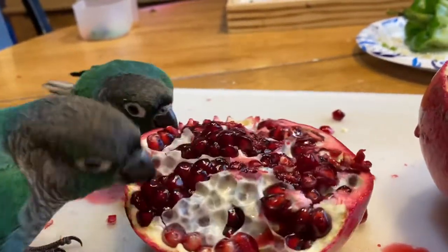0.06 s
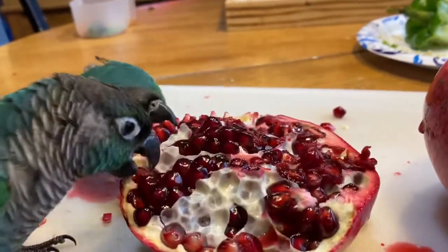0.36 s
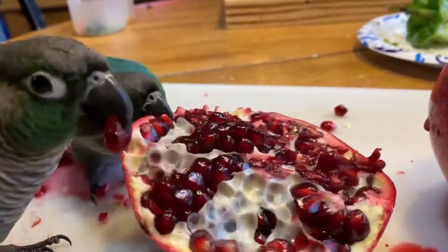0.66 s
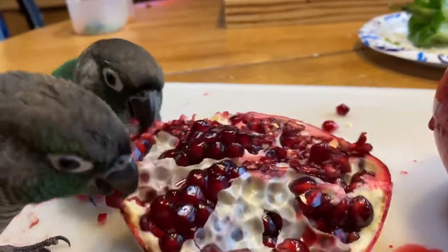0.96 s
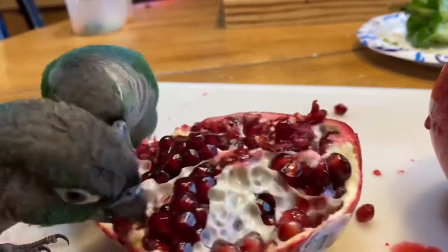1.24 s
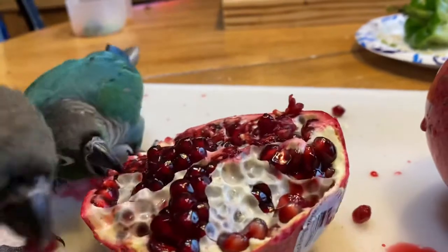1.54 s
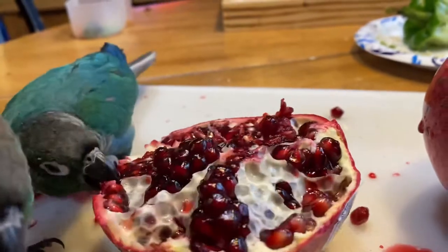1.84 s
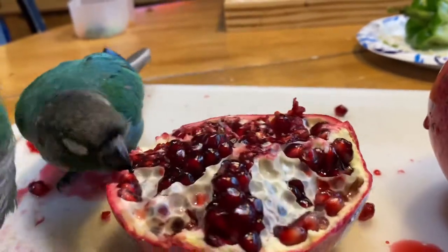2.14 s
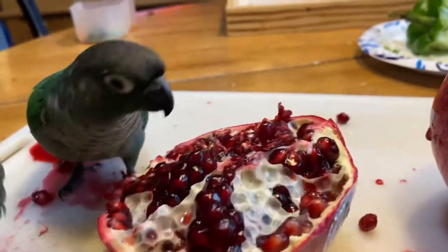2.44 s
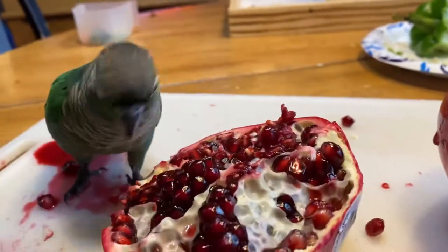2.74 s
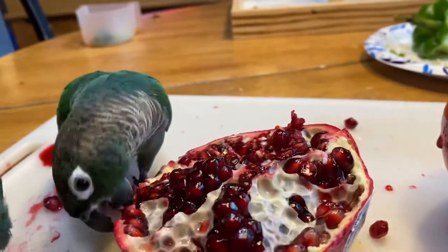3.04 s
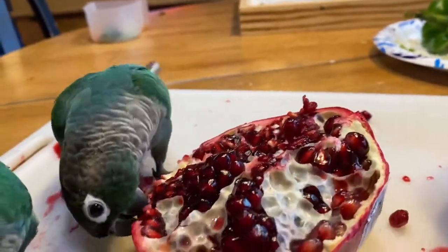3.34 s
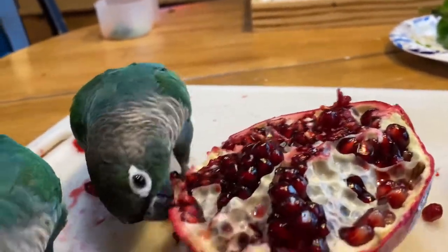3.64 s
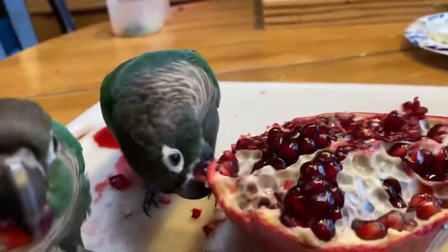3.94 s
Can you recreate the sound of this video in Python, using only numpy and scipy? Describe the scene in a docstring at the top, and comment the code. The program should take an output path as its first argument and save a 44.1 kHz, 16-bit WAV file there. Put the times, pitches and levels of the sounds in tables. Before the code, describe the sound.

Parrots nibble a juicy pomegranate with small sharp snaps and wet crackles in a quiet room.

```python
"""Two small parrots eat a halved pomegranate on a cutting board, close by.
Seed skins burst with sharp snaps, wet pulp crackles as it is squeezed, and a beak creaks
as it sticks and slips on the rind. The fruit knocks on the board, something rustles once,
and a thin hiss comes and goes. Under it all a household appliance drones in a quiet room."""
import sys
import numpy as np
from scipy import signal
from scipy.fft import rfft, irfft
from scipy.io import wavfile
from scipy.ndimage import uniform_filter1d

SR = 44100
rng = np.random.default_rng(int(sys.argv[2]) if len(sys.argv) > 2 else 0)


def int16_out(signal):
    """Quantize to a 16-bit WAV file."""
    q = np.round(np.clip(np.atleast_2d(signal).T, -1, 1) * 32767)
    wavfile.write(sys.argv[1], SR, q.astype(np.int16))


N = 176400  # 4 seconds
TIMES, FREQS = np.arange(N) / SR, np.fft.rfftfreq(N, 1 / SR)
OPPOSITE = np.array([[1], [-1]])  # adds a sound on the left and subtracts it on the right


def undb(db):
    """Turn decibels into a number to multiply by."""
    return 10 ** (np.asarray(db) / 20)


def unit(x):
    """Scale a sound so its average strength (rms) is 1."""
    return x / np.sqrt(np.mean(x ** 2))


def noise():
    """White noise: an even hiss."""
    return rng.standard_normal(N)


def colour(x, spectrum):
    """Make each frequency louder or softer, following rows of Hz and dB."""
    hz, db = np.array(spectrum).T
    gain = undb(np.interp(np.log(FREQS + 1), np.log(hz), db))
    return irfft(rfft(x) * gain, N)


def band(x, hz, octaves):
    """Keep the frequencies around one pitch, at strength 1."""
    away = np.log2((FREQS + 1) / hz) / octaves
    return unit(irfft(rfft(x) * np.exp(-away ** 2 / 2), N))


def curve(rows):
    """Join rows of time and value with straight lines."""
    return np.interp(TIMES, *np.array(rows).T)


def wander(per_s):
    """Glide between random values, about 1 in size."""
    step = int(SR / per_s)
    stairs = np.repeat(rng.standard_normal(N // step + 1), step)
    return unit(uniform_filter1d(stairs, step)[:N])


def envelope(t, attack, hold, decay):
    """Rise, stay up until the time `hold`, then die away."""
    return np.clip(t / attack, 0, 1) * np.exp(-np.maximum(t - hold, 0) / decay)


def grains(per_s, spread_db):
    """Tiny clicks of uneven size at random times."""
    clicks = (rng.random(N) < per_s / SR) * np.sign(noise())
    sizes = undb(spread_db * np.minimum(rng.exponential(size=N), 4))
    return unit(clicks * sizes)


def nearby(make, likeness=.93, lag_ms=.275):
    """A close sound in stereo: both sides mostly alike, the left a little late."""
    left, right = np.sqrt(likeness) * make() + np.sqrt(1 - likeness) * np.array([make(), make()])
    return np.array([np.roll(left, int(lag_ms * SR / 1000)), right])


def add(out, start, x):
    """Mix in a short sound at a time in seconds."""
    i = max(int(start * SR), 0)
    out[..., i:i + x.shape[-1]] += x[..., :N - i]


def early_echoes(x, count=12, longest_ms=13, db=-3, above_hz=830):
    """Nearby surfaces ripple the treble with weak, quick echoes."""
    lags = rng.uniform(.1, 1, (count, 2, 1)) * longest_ms / 1000
    echoes = sum(np.exp(-2j * np.pi * FREQS * lag) for lag in lags) / np.sqrt(count)
    treble = FREQS ** 2 / (FREQS ** 2 + above_hz ** 2)
    return irfft(rfft(x) * (1 + undb(db) * echoes * treble), N)


def room_echo(x, fade_s=.11, db=-12.5):
    """The room adds a short, dull echo that falls 60 dB in fade_s."""
    t = np.arange(SR // 2) / SR
    dull = signal.lfilter([1], [1, -.5], rng.standard_normal((2, len(t))))
    tail = dull * np.exp(-np.log(1000) * t / fade_s) * (t > .004)
    return x + undb(db) * signal.fftconvolve(x, unit(tail) / np.sqrt(len(t)), axes=1)[:, :N]


# Room noise: the part both sides share, and the part that differs between them.
# Each row: frequency in Hz, level in dB.
AIR_SHARED = [(20, -102), (45, -68.5), (90, -73), (230, -66.5), (270, -74.5), (400, -80), (620, -84.5),
              (740, -79), (930, -88.5), (1600, -89), (2500, -94), (3800, -102), (4700, -97), (6000, -106),
              (8000, -116), (11000, -130), (16000, -134)]
AIR_DIFFERENT = [(20, -67), (50, -98), (85, -63), (120, -82.5), (210, -73.5), (270, -81.5), (400, -81),
                 (600, -83.5), (740, -78), (950, -87), (1900, -91.5), (2600, -99), (3800, -103.5),
                 (4700, -101.5), (6000, -107), (8000, -118), (11000, -130), (16000, -134)]

def room_air():
    """The soft, low rush of air in a quiet room."""
    air = colour(noise(), AIR_SHARED) + OPPOSITE * colour(noise(), AIR_DIFFERENT)
    return air * np.sqrt(SR / 2)


# The pitches in the drone. Each row: pitch in Hz, width in Hz, level in dB.
DRONE_PEAKS = [(60.9, 5.7, -43), (72.2, 6.3, -42.5), (85.3, 8, -49.5), (123.1, 16.3, -41),
               (159.5, 18.8, -46.5), (204.2, 12.3, -43), (235, 6.4, -56), (302.8, 2.6, -60),
               (545.7, 4.9, -70), (734.6, 21, -63.5), (876.6, 16.3, -61.5), (419.7, 11, -70),
               (480.6, 8.1, -66.5)]

def appliance(side_db=-9, wide_hz=860):
    """An appliance resonates at a few narrow pitches; the low ones are alike on both sides."""
    power = sum(undb(db) ** 2 * unit(1 / (1 + ((FREQS - hz) / width) ** 2) ** 2) ** 2
                for hz, width, db in DRONE_PEAKS)
    peaks = np.sqrt(power)
    spread = undb(side_db) * np.minimum(FREQS / wide_hz, 1)
    return irfft(rfft(noise()) * peaks, N) + OPPOSITE * irfft(rfft(noise()) * peaks * spread, N)


# The rise and fall of the rumble. Each row: time in seconds, bass boost or cut in dB.
BASS_CHANGES = [(0, -7), (.38, 3.5), (.68, -6), (.9, -2.5), (1.6, 1), (2.2, 1.5), (2.62, 3), (2.85, -0.5),
                (3.4, -1), (4, -1.5)]

def background(waver_db=1, bass_top_hz=111):
    """Gently wavering air plus the drone; their bass slowly swells and sinks."""
    air, drone = room_air(), appliance()
    both = early_echoes(air) * undb(waver_db * wander(per_s=8.9)) + drone
    bass = irfft(rfft(both) / (1 + (FREQS / bass_top_hz) ** 8), N)
    return both + bass * (undb(curve(BASS_CHANGES)) - 1)


# Swells of hiss. Each row: time of the peak in seconds, level in dB, width in seconds.
HISS_PEAKS = [(1.133, -65.5, 0.12), (1.87, -64, 0.019), (2.51, -62, 0.049), (2.84, -61.5, .035),
              (3.04, -68, 0.037)]

def hiss(flicker_db=2):
    """A thin, faint hiss swells and fades now and then."""
    swells = sum(undb(db) * np.exp(-((TIMES - peak) / width) ** 2 / 2) for peak, db, width in HISS_PEAKS)
    flicker = undb(flicker_db * wander(per_s=46))
    return swells * flicker * band(nearby(noise), hz=4530, octaves=.089)


# The loudness of the rustle. Each row: time in seconds, relative level in dB.
RUSTLE_LEVELS = [(2.225, -80), (2.243, -48), (2.256, -39), (2.272, -38.5), (2.297, -42), (2.31, -40),
                 (2.335, -46), (2.37, -53), (2.45, -75)]
# Its tone. Each row: frequency in Hz, relative level in dB.
RUSTLE_TONE = [(300, 6), (650, 17), (1100, 7), (2500, 7.5), (4300, 3.5), (6000, 0.5), (8000, -8),
               (11000, -10), (16000, -21)]

def rustle(gain_db=-2, flicker_db=1.5):
    """A brief brushing, like feathers: close, scratchy clicks in a soft, wide hiss."""
    loudness = undb(gain_db + curve(RUSTLE_LEVELS) + flicker_db * wander(per_s=200))
    scratches = nearby(lambda: grains(per_s=2500, spread_db=1.7))
    brushing = np.array([noise(), noise()])
    return loudness * unit(colour(scratches + brushing, RUSTLE_TONE))


# Knocks on the board. Each row: start in seconds, level in dB, pitch of the thud in Hz.
BOARD_KNOCKS = [(0.566, -52, 750), (1.2044, -35, 590), (1.2295, -42, 700), (2.3081, -34, 1300),
                (3.352, -43, 1400), (3.651, -47, 720)]
# The board's notes. Each row: pitch in Hz, level against the knock in dB, seconds to fall 60 dB.
BOARD_NOTES = [(650, -11, .04), (725, -6, .05), (1075, -11, .035), (1260, -9, .02), (1900, -10, .02)]

def knocks():
    """The fruit taps the board: a dry thud, and the board rings briefly."""
    t, out = np.arange(SR // 6) / SR, np.zeros((2, N))
    shape = envelope(t, attack=.001, hold=.001, decay=.005)
    for start, db, thud_hz in BOARD_KNOCKS:
        tap = band(nearby(noise), thud_hz, octaves=.7)[:, :len(t)] * shape
        for hz, note_db, fade_s in BOARD_NOTES:
            ring = np.exp(-np.log(1000) * t / fade_s) * np.sin(2 * np.pi * hz * t)
            tap += undb(note_db) * ring * rng.uniform(.7, 1, (2, 1))
        add(out, start, undb(db) * tap)
    return out


# Slips of the beak on the rind. Each row: start in seconds, squeak pitch in Hz, squeak level in dB,
# milliseconds until the squeak starts to fade, scratch level in dB.
BEAK_SLIPS = [(1.4748, 1740, -41, 3.2, -41), (1.4851, 2200, -32, 2, -40),
              (1.4958, 2400, -29.5, 1.57, -30.5), (1.5069, 2420, -33, 1.5, -34),
              (1.5242, 1950, -31.5, 1.6, -40), (1.5671, 2694, -27.5, 2.7, -41),
              (1.5756, 2410, -27, 1.75, -40.5), (1.5811, 2720, -29, 1.44, -39.5),
              (1.59, 2320, -39, 0.62, -46)]
# The notes in a squeak. Each row: multiple of the squeak's pitch, level against the squeak in dB.
BEAK_NOTES = [(.33, -14), (.5, -20), (.78, -10), (1, -1), (1.3, -9.5), (2.05, -16), (2.9, -20.5)]
# The tone of the scratch. Each row: frequency in Hz, relative level in dB.
SCRATCH_TONE = [(350, 2), (800, 12), (1700, 0), (3500, -5), (7000, -2), (9000, -12), (12500, -17),
                (15000, -9)]

def beak_creak(tail_db=-21, left_louder_db=4):
    """The beak sticks and slips: each slip scratches, then squeaks for a few cycles."""
    t = np.arange(SR // 20) / SR
    ms = t * 1000
    squeaks, scratches = np.zeros((2, N)), np.zeros(N)
    for start, hz, db, hold_ms, scratch_db in BEAK_SLIPS:
        shape = envelope(ms, attack=.5, hold=hold_ms, decay=.5)
        tail_shape = undb(tail_db) * envelope(ms, attack=1.1, hold=hold_ms, decay=5)
        for multiple, note_db in BEAK_NOTES:
            phase = 2 * np.pi * hz * multiple * t
            ring = shape * np.sin(phase + .7 * rng.standard_normal((2, 1)))
            detune, shift = rng.standard_normal(2)
            tail = tail_shape * np.sin(phase * (1 + .084 * detune) + shift)
            add(squeaks, start, undb(db + note_db) * (ring + tail))
        add(scratches, start, undb(scratch_db) * envelope(ms, attack=.15, hold=hold_ms / 2, decay=.6))
    scratch_noise = unit(colour(np.array([noise(), noise()]), SCRATCH_TONE))
    return squeaks * undb(OPPOSITE * left_louder_db / 2) + scratches * scratch_noise


# The tone under squishes and snaps. Each row: frequency in Hz, relative level in dB.
BODY_TONE = [(300, -9), (900, 13.5), (1700, 4), (3000, 1), (4800, 12), (7000, 6.5), (12000, -3)]

def body_noise():
    """The duller noise that makes a bite sound full."""
    return nearby(lambda: unit(colour(noise(), BODY_TONE)))


# The tone of the juice. Each row: frequency in Hz, relative level in dB.
JUICE_TONE = [(1200, -15), (3000, -7), (5000, -1), (7800, 0), (11000, -1), (13000, -8), (15000, -4),
              (16200, -10)]

def juice_crackle(per_s, spread_db):
    """Tiny bursts of juice make bright clicks."""
    return nearby(lambda: unit(colour(grains(per_s, spread_db), JUICE_TONE)))


# Squeezes of pulp. Each row: time of the peak in seconds, level in dB, rise and fall in seconds.
SQUEEZES = [(0.096, -48, 0.0051, 0.0045), (.115, -60, .01, .02), (.505, -57, 0.013, 0.013),
            (0.543, -49, .004, 0.007), (0.705, -47, 0.0073, 0.0019), (.72, -65, 0.11, .025),
            (.88, -63, 0.016, .015), (1.345, -62, 0.063, 0.066), (1.652, -57.5, 0.024, 0.038),
            (2.044, -51, 0.017, 0.0045), (3.27, -60, 0.065, 0.042), (3.602, -48.5, 0.013, 0.011)]
# Faint, wet nibbling. Each row: time in seconds, level in dB.
NIBBLE_LEVELS = [(0, -69), (.15, -72), (.25, -80), (.35, -72), (.75, -76.5), (1, -78), (1.14, -83),
                 (1.43, -72), (1.75, -75.5), (1.93, -71), (2.15, -71), (2.55, -83), (2.83, -78.5), (3, -81),
                 (3.12, -68), (3.45, -78), (3.88, -81), (4, -68.5)]

def pulp(pop_db=-1, body_db=1):
    """Pulp crackles with each squeeze, fuller when it is hard; nibbling pops single droplets."""
    squeeze_power = np.zeros(N)
    for peak, db, rise, fall in SQUEEZES:
        away = np.maximum((peak - TIMES) / rise, (TIMES - peak) / fall)
        squeeze_power += (undb(db) * np.exp(-np.minimum(away, 20))) ** 2
    nibble = undb(curve(NIBBLE_LEVELS))
    fizz = np.sqrt(nibble ** 2 + squeeze_power) * juice_crackle(per_s=4000, spread_db=-2)
    pops = undb(pop_db) * nibble * juice_crackle(per_s=170, spread_db=3.2)
    body = undb(body_db) * squeeze_power / np.sqrt(squeeze_power.max()) * body_noise()
    return fizz + pops + body


# Bursting seeds. Each row: start in seconds, level in dB, fade time in milliseconds,
# level of the body against the crack in dB.
SEED_SNAPS = [(0.0228, -42.5, 0.69, 4), (0.107, -40, 0.43, -2), (0.1196, -45, 0.67, -3),
              (0.499, -42.5, 1.1, -1), (0.5645, -41.5, 0.87, -0.5), (0.7255, -47.5, 3.1, 0.5),
              (1.204, -39.5, 2, 5), (1.366, -39.5, 1.26, 5.5), (1.386, -38.5, 1.3, -4),
              (1.6397, -42.5, 0.75, 7.5), (1.787, -56, 0.85, 1), (2.016, -47.5, 0.54, 5),
              (2.0313, -50, .6, -13), (2.047, -41, 1.4, 0), (2.315, -43.5, 2.2, -6), (2.3253, -44, 1.2, -8),
              (3.025, -54.5, .4, -8), (3.075, -64, 1.2, 9), (3.217, -53, 1.7, 3), (3.249, -49, .7, 4),
              (3.2716, -46.5, 0.88, 0), (3.3006, -27, 0.45, -19), (3.3517, -27, 0.29, -10),
              (3.5169, -57, .5, -2), (3.7898, -62, .5, -2)]
# The tone of the crack. Each row: frequency in Hz, relative level in dB.
CRACK_TONE = [(2000, -20), (5000, -11), (7800, .5), (10800, 3), (13000, -5), (15000, -3.5), (16000, -7)]

def seed_snaps(tail_db=-22):
    """Seed skins burst: a bright crack, a duller body and a wet tail, weaker for the quickest snaps."""
    ms = np.arange(SR // 20) * 1000 / SR
    tail = undb(tail_db) * envelope(ms, attack=1, hold=.37, decay=6)
    cracks, bodies = np.zeros(N), np.zeros(N)
    for start, db, fade_ms, body_db in SEED_SNAPS:
        burst = envelope(ms, attack=.12, hold=fade_ms / 2, decay=fade_ms)
        shape = burst + min(fade_ms, 1) * tail
        add(cracks, start, undb(db) * shape)
        add(bodies, start, undb(db + body_db) * shape)
    crack_noise = nearby(lambda: unit(colour(noise(), CRACK_TONE)))
    return cracks * crack_noise + bodies * body_noise()


def scene():
    """The feeding birds echo in the room, over the air and the drone."""
    feeding = seed_snaps() + beak_creak() + knocks() + pulp() + rustle() + hiss()
    return room_echo(feeding) + background()


def record(dry):
    """Cut away the treble above 16000 Hz."""
    return signal.sosfilt(signal.ellip(10, .2, 80, 16000, fs=SR, output="sos"), dry)


dry = scene()
out = record(dry)
int16_out(out)
```